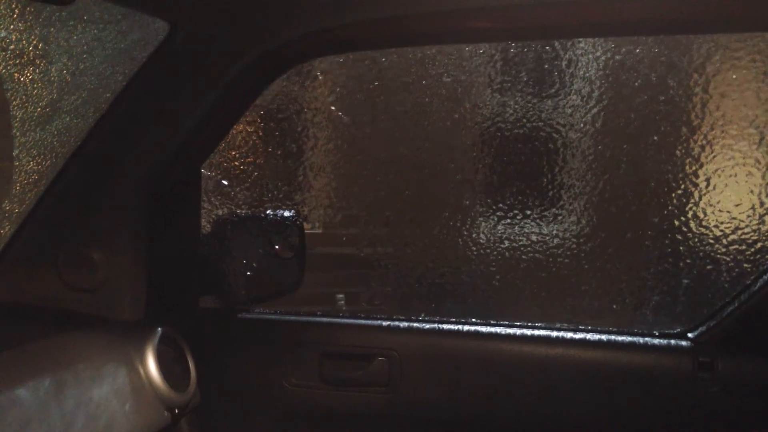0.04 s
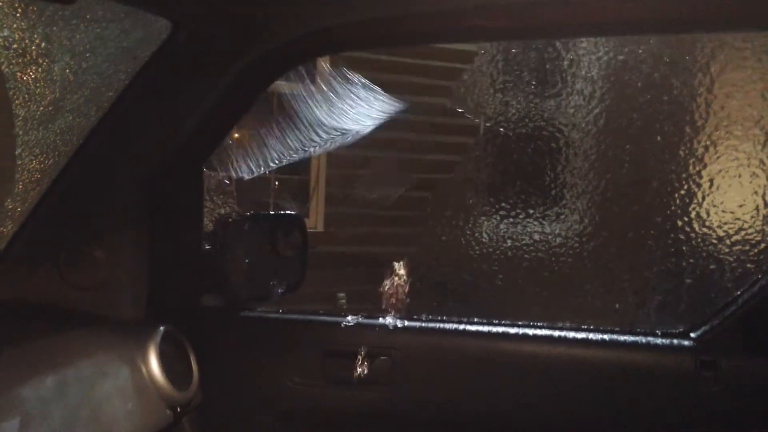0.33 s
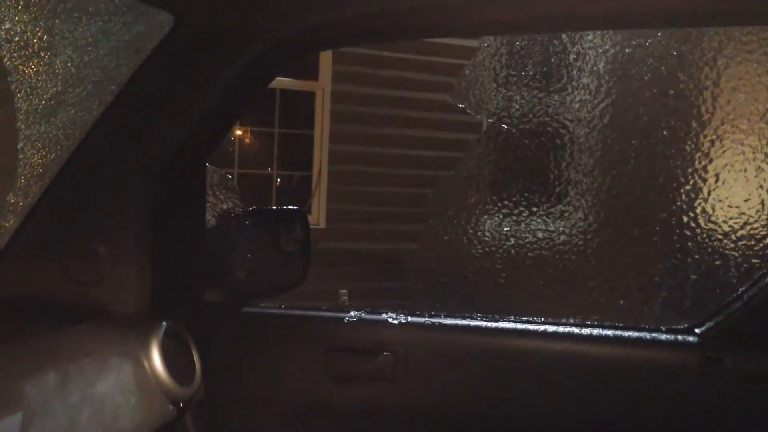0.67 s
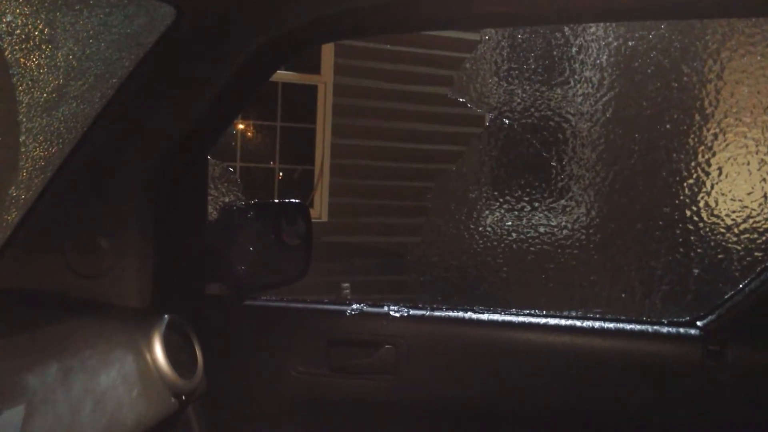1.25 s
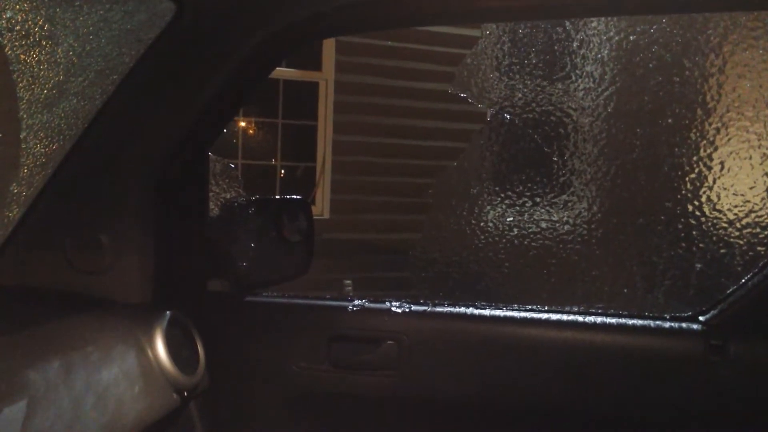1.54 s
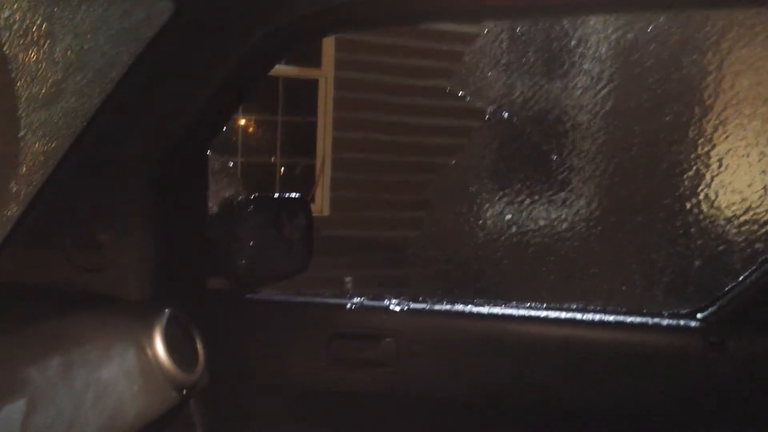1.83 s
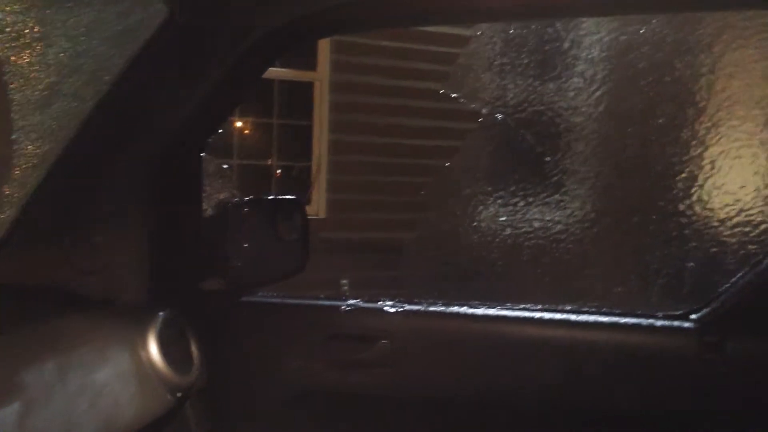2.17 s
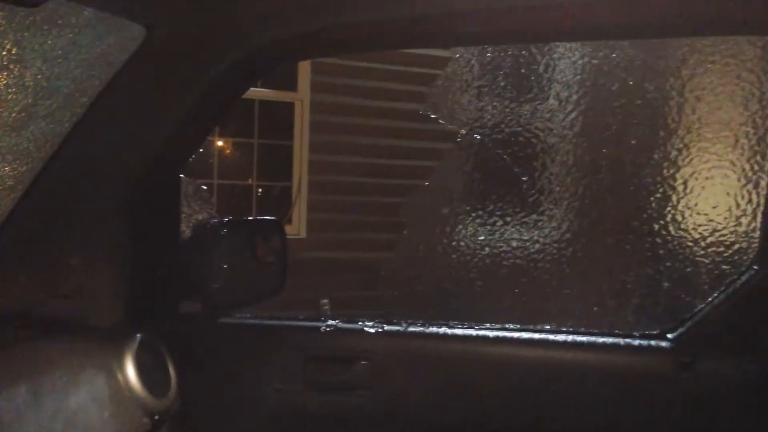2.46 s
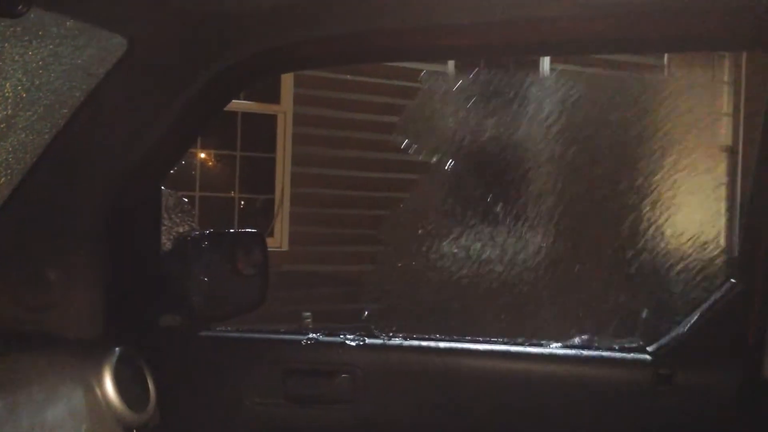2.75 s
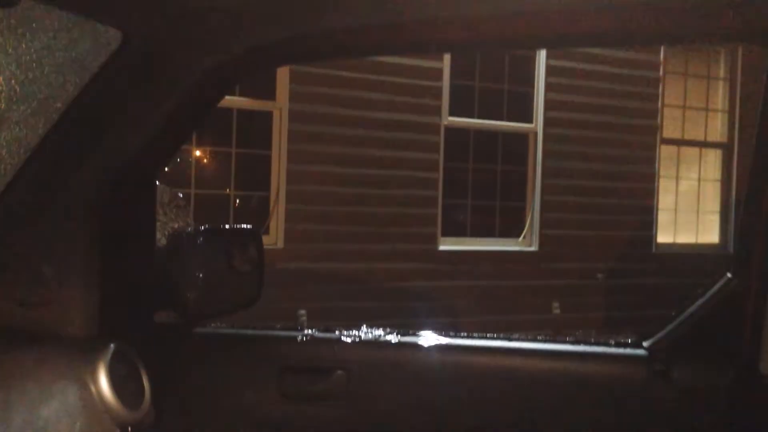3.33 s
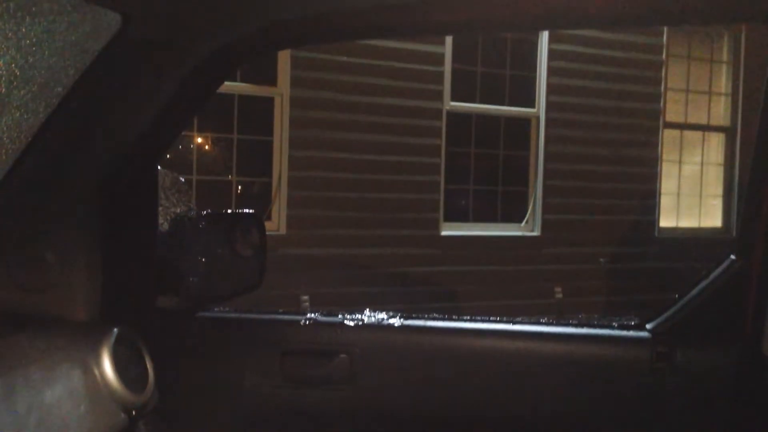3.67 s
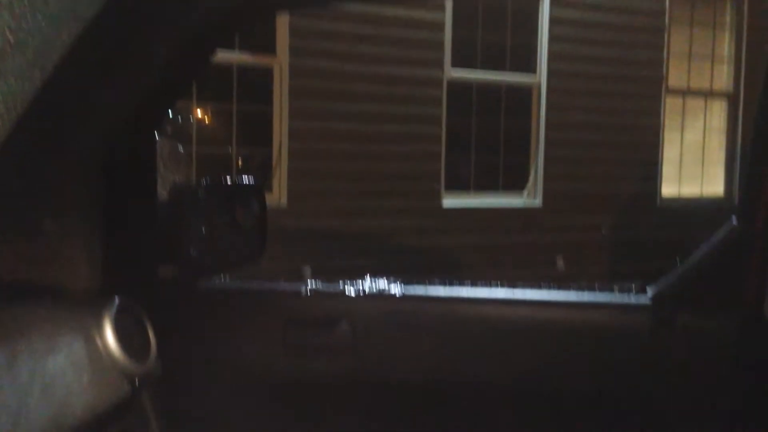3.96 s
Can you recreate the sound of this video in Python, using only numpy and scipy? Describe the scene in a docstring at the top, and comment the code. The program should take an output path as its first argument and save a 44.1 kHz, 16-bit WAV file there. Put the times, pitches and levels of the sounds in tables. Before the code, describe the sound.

Ice cracks off a car window, then shatters against the door over a low idling engine.

```python
"""In the seat of an idling car at night, a sheet of ice is heard breaking off the side window.
A first piece cracks by brittle fracture and crumbles away; after a pause the rest gives way, tips inward
and shatters on the door. Slabs thump the door panel, shards clink in their plate modes and crumbs
trickle down in tiny impacts, over the low harmonic hum of the engine."""
import sys
import numpy as np
from scipy import signal
from scipy.fft import rfft, irfft
from scipy.io import wavfile
from scipy.ndimage import uniform_filter1d

SR = 44100
rng = np.random.default_rng(int(sys.argv[2]) if len(sys.argv) > 2 else 0)


def store_pcm(level_fs):
    """Save levels as 16-bit WAV."""
    pcm = np.round(np.clip(level_fs, -1, 1) * 32767).astype(np.int16)
    wavfile.write(sys.argv[1], SR, np.atleast_2d(pcm).T)


N = 176400

# spectra of breaking ice in three registers: (frequency [Hz], relative spectral density [dB])
ICE_TREBLE = [(1800, -41), (3000, -9), (3900, 2), (6000, 3), (8500, 2.5), (11000, -1), (15000, -6)]
ICE_MIDDLE = [(450, -39.5), (800, -3.5), (1100, 0), (1700, 3), (2500, 4), (3300, -0.5), (4500, -10),
              (8000, -51)]
ICE_BODY = [(70, -29), (160, -4.5), (300, -7.5), (500, -10), (800, -6), (1100, -9.5), (2200, -46.5)]
# relative strength of the shower of fragments: (time [s], treble [dB], middle [dB], body [dB])
SHOWER_ENVELOPE = [(3.1, -37.5, -50.5, -80), (3.159, -34, -27.5, -40), (3.192, -52, -60, -59),
                   (3.225, -35, -41.5, -40.5), (3.295, -39.5, -53.5, -79), (3.315, -28, -33.5, -34),
                   (3.345, -26.5, -32.5, -48), (3.396, -26.5, -40, -23.5), (3.425, -30, -37.5, -45),
                   (3.47, -26, -34.5, -32), (3.59, -28, -34.5, -51), (3.64, -25.5, -31.5, -35.5),
                   (3.71, -25.5, -31, -43), (3.76, -31.5, -42.5, -52), (3.83, -37.5, -45.5, -60),
                   (3.88, -48.5, -48, -52.5), (4, -46, -52.5, -76)]


def amp(db):
    """Amplitude ratio of a level in decibels."""
    return 10 ** (np.asarray(db) / 20)


def unit(x):
    """Normalisation to rms 1."""
    return x / np.sqrt(np.mean(x ** 2) + 1e-20)


def add(mix, start_s, sound):
    """Superposition: a sound joins the mix at its starting time."""
    part = mix[max(round(start_s * SR), 0):][:len(sound)]
    part += sound[:len(part)]


def drift(size, rate_hz):
    """Low-pass noise: a smooth random wander of rms 1."""
    lowpass = np.exp(-(np.fft.rfftfreq(size, 1 / SR) / rate_hz) ** 2)
    return unit(irfft(rfft(rng.standard_normal(size)) * lowpass, size))


def gain_at(freqs, spectrum):
    """Amplitude response, interpolated in decibels over log frequency."""
    hz, db = np.transpose(spectrum)
    return amp(np.interp(np.log(abs(freqs) + 1), np.log(hz), db))


def colour(spectrum, size=2048):
    """Causal impulse response: the phase follows from the Hilbert transform of the log gain."""
    log_gain = np.log(gain_at(np.fft.fftfreq(size, 1 / SR), spectrum))
    return np.fft.ifft(np.exp(np.conj(signal.hilbert(log_gain)))).real[:size // 2]


def cabin_path(size=8192):
    """Reverberation: direct sound, quick reflections off glass and door, and a short decaying tail."""
    t = np.arange(size) / SR
    path = np.zeros(size)
    for t60, db in (0.06, 6.5), (0.16, 4.5):  # early reflections, tail
        echoes = rng.standard_normal(size) * (rng.random(size) < .1) * amp(-60 * t / t60)
        path += amp(db) * echoes / np.linalg.norm(echoes)
    path[0] = 1
    return path


def clicks(size, per_s, spread_db):
    """Poisson process: tiny fractures at random moments, most small and a few large."""
    strengths = amp(spread_db * np.minimum(rng.exponential(1, size), 4))
    return strengths * rng.choice([-1, 1], size) * (rng.random(size) < per_s / SR)


def idling_engine(firing_hz=38.66, jitter_hz=0.51, waver_hz=9, waver_db=1.6, air_db=-52):
    """Periodic firing gives a harmonic series, which wavers over the broadband noise of the cabin."""
    # cabin rumble and fan hiss: (frequency [Hz], relative spectral density [dB])
    air_spectrum = [(20, -15), (43, -4), (75, -5.5), (110, -1), (170, -12.5), (250, -11), (340, -22.5),
                    (480, -15.5), (850, -28), (1100, -22.5), (1350, -22), (1600, -24), (2500, -29.5),
                    (6000, -37.5), (15000, -46)]
    # harmonics of the firing rate, from the first up: (rms level [dB])
    harmonic_levels = [-54.5, -69, -52.5, -61.5, -61]
    air_gain = gain_at(np.fft.rfftfreq(N, 1 / SR), air_spectrum)
    out = amp(air_db) * unit(irfft(rfft(rng.standard_normal(N)) * air_gain, N))
    cycles = np.cumsum(firing_hz + jitter_hz * drift(N, waver_hz)) / SR
    for k, db in enumerate(harmonic_levels, 1):
        waver = amp(waver_db * drift(N, waver_hz))
        out += amp(db) * unit(waver * np.sin(2 * np.pi * (k * cycles + rng.random())))
    return out


def crumbs(envelope, per_s, spread_db, gain_db, ring_db, ring_t60, spots=6, mode_count=6):
    """Impact excitation: fragments tick at several spots, each ringing in a few random plate modes."""
    times, *levels = np.transpose(envelope)
    now = np.arange(times[0], times[-1], 1 / SR)
    rattle, out = np.zeros(len(now)), np.zeros(N)
    for _ in range(spots):
        path = cabin_path()
        path[0] *= 2  # small crumbs tick dry
        t = np.arange(len(path)) / SR
        mode_hz = rng.uniform(700, 6000, (mode_count, 1))
        modes = np.sin(2 * np.pi * mode_hz * t).sum(0) * amp(-60 * t / ring_t60)
        path += amp(ring_db) * modes / np.linalg.norm(modes)
        rattle += signal.fftconvolve(clicks(len(now), per_s / spots, spread_db), path)[:len(now)]
    for db, spectrum in zip(levels, (ICE_TREBLE, ICE_MIDDLE, ICE_BODY)):
        band = unit(signal.fftconvolve(rattle, colour(spectrum))[:len(now)])
        add(out, times[0], amp(np.interp(now, times, db) + gain_db) * band)
    return out


def peeling():
    """Friction: crumbs grind off the glass between the snaps."""
    # relative strength of the grinding: (time [s], treble [dB], middle [dB])
    envelope = [(0, -48.5, -50), (.11, -56, -59), (.14, -51.5, -59), (.27, -40.5, -50), (.47, -55, -65),
                (.545, -52, -58), (.6, -38.5, -44), (.68, -51, -69), (.76, -38.5, -43.5), (.86, -51, -66),
                (.91, -42, -46.5), (1.0, -50, -58), (1.06, -42.5, -54), (1.2, -63, -65), (1.32, -55.5, -73),
                (1.55, -69, -70), (2.35, -65.5, -70), (2.56, -54, -61.5), (2.66, -62, -67),
                (2.78, -50.5, -52), (2.85, -40.5, -48.5), (2.96, -55.5, -58), (3.02, -50, -46),
                (3.12, -47, -50.5)]
    return crumbs(envelope, per_s=700, spread_db=3.0, gain_db=-2, ring_db=-1.5, ring_t60=.02)


def cracks(build_s=0.0015, build_db=1, snap_db=-6, direct_db=-7, gain_db=-7.5):
    """Brittle fracture: splintering gathers just before each snap and dies away exponentially."""
    # snaps, with relative peak levels: (time [s], treble [dB], middle [dB], decay time constant [s])
    fractures = [(0.0597, -31.5, -33, 0.025), (0.1018, -33.5, -31.5, 0.0025), (0.166, -28, -33.5, 0.0068),
                 (0.243, -31.5, -36.5, 0.0052), (0.271, -37, -39.5, 0.005), (0.296, -34, -36.5, 0.0033),
                 (0.3682, -38, -36.5, 0.0017), (0.419, -36, -45, 0.0021), (0.436, -40, -42.5, 0.0034),
                 (0.553, -35, -39, 0.0048), (0.5601, -21.5, -26.5, 0.0048), (0.571, -27.5, -26.5, 0.0013),
                 (0.585, -27, -42, 0.0076), (0.611, -26.5, -34, 0.0085), (0.629, -23, -46, 0.0024),
                 (0.7049, -32.5, -30, 0.0024), (0.724, -32, -35, 0.0037), (0.774, -29, -52, 0.0042),
                 (0.7957, -28.5, -36, 0.003), (0.8179, -50, -35.5, 0.0039), (0.8795, -29, -39, 0.004),
                 (0.8876, -21.5, -37, 0.0062), (0.8954, -25.5, -43, 0.0022), (0.963, -32.5, -37.5, 0.0039),
                 (1.0215, -32.5, -32.5, 0.006), (1.0443, -32.5, -55, 0.0025), (1.083, -33.5, -40, 0.0032),
                 (1.1229, -40.5, -38.5, 0.0081), (1.2788, -40.5, -40.5, 0.003), (1.2902, -33.5, -48, 0.003),
                 (1.299, -36.5, -47.5, 0.005), (1.34, -41.5, -44, 0.0012), (1.378, -40.5, -71, 0.0018),
                 (2.536, -44, -67, 0.0036), (2.675, -49.5, -48.5, 0.002), (2.7113, -41, -44.5, 0.0085),
                 (2.7746, -42, -49, 0.0034), (2.8044, -37.5, -36, 0.0035), (2.9031, -36, -48, 0.002),
                 (3.1195, -23.5, -29, 0.0051), (3.142, -17.5, -25.5, 0.014), (3.1554, -10.5, -22, 0.0051),
                 (3.1611, -16, -38, 0.0023), (3.1965, -35, -26.5, 0.0022), (3.2099, -24.5, -34, 0.0057),
                 (3.2258, -17, -37, 0.0045), (3.2998, -26, -28, 0.0052), (3.3251, -18, -26, 0.0029),
                 (3.3343, -14, -14, 0.0059), (3.357, -16, -19.5, 0.0024), (3.3876, -22.5, -18, 0.0041),
                 (3.3929, -22.5, -19.5, 0.0049), (3.4313, -27, -28, 0.0032), (3.4579, -22, -23.5, 0.002),
                 (3.4672, -20.5, -36, 0.0022), (3.5295, -21.5, -27, 0.0028), (3.544, -24, -24, 0.0051),
                 (3.6237, -18.5, -24.5, 0.0037), (3.633, -34, -18, 0.0027), (3.6523, -27, -23, 0.0055),
                 (3.6842, -20, -23, 0.0059), (3.785, -26, -39, 0.0042), (3.852, -31.5, -34.5, 0.033),
                 (3.895, -26.5, -33, 0.0047), (3.914, -25.5, -50, 0.0027), (3.9316, -29, -56, 0.005)]
    typical_treble_db, typical_middle_db = -26, -38.5  # an ordinary crack
    size, snap_at = 8192, 600  # samples
    out, t = np.zeros(N), (np.arange(size) - snap_at) / SR
    middle, body = colour(ICE_MIDDLE), colour(ICE_BODY)
    for start_s, treble_db, middle_db, decay_s in fractures:
        stress = np.where(t < 0, amp(build_db) * np.exp(-abs(t) / build_s), np.exp(-abs(t) / decay_s))
        splinters = clicks(size, per_s=2400, spread_db=4.5) * stress
        splinters /= np.linalg.norm(splinters) + 1e-9
        splinters[snap_at] += amp(snap_db)
        heard = signal.fftconvolve(splinters, cabin_path())[:size]
        heard[snap_at] += amp(direct_db)  # the snap also comes straight through the glass
        bulk_db = middle_db - typical_middle_db
        body_db = middle_db - 12 + 0.15 * bulk_db  # bigger pieces gain body
        tilt_db_per_octave = 0.42 * (treble_db - typical_treble_db - bulk_db)  # thin ones are brighter
        treble = colour([(hz, db + tilt_db_per_octave * np.log2(hz / SR)) for hz, db in ICE_TREBLE])
        for db, register in (treble_db, treble), (middle_db, middle), (body_db, body):
            band = signal.fftconvolve(heard, register)
            peak_rms = np.sqrt(uniform_filter1d(band ** 2, 350, mode="constant").max())
            add(out, start_s + t[0], amp(db + gain_db) * band / peak_rms)
    return out


def struck_mode(hz, db, t60, rise_s, size=16384):
    """Damped oscillator: a sinusoid rises quickly and decays exponentially."""
    t = np.arange(size) / SR
    return amp(db - 60 * t / t60) * np.minimum(t / rise_s, 1) * np.sin(2 * np.pi * hz * t)


def roughen(tone, depth, rate_hz):
    """Random amplitude modulation that preserves the rms level."""
    return np.std(tone) * unit(tone * (1 + depth * drift(len(tone), rate_hz)))


def shard(hz, db):
    """Free vibration: a small plate rings in inharmonic modes, chattering against what it lands on."""
    # plate modes: (frequency / pitch [ratio], relative level [dB], t60 [s])
    modes = [(0.997, 1, 0.045), (1.498, -15, 0.039), (3.4, -20, 0.049)]
    tone = sum(struck_mode(hz * k, db + mode_db, t60, rise_s=0.0017) for k, mode_db, t60 in modes)
    return roughen(tone, depth=0.56, rate_hz=140)


def clinks(per_s=96, low_hz=529, high_hz=4890, gain_db=1.5):
    """Plate resonance: a few large shards ring, and many of random pitch follow the shower's strength."""
    # large loose shards: (time [s], pitch [Hz], level [dB])
    large_shards = [(0.1, 1490, -43), (0.557, 1700, -26), (1.122, 1177, -29.5), (3.301, 842, -27),
                    (3.499, 1720, -22.5), (3.766, 1716, -24.5), (3.901, 3170, -26.5)]
    out = np.zeros(N)
    for start_s, hz, db in large_shards:
        add(out, start_s, shard(hz, db))
    times, _, middle_db, _ = np.transpose(SHOWER_ENVELOPE)
    span_s = times[-1] - times[0]
    for when, pitch in rng.random((round(per_s * span_s), 2)):
        start_s = times[0] + when * span_s
        hz = low_hz * (high_hz / low_hz) ** pitch
        add(out, start_s, shard(hz, np.interp(start_s, times, middle_db) + gain_db))
    return out


def thumps():
    """Damped panel resonance: the window and padded door boom and shudder under the larger slabs."""
    # slabs knocking on the glass and landing on the door: (time [s], pitch [Hz], level [dB], t60 [s])
    slabs = [(0.111, 162, -30.5, 0.1), (0.563, 587, -30, 0.049), (2.816, 134, -34, 0.25),
             (3.334, 151, -30, 0.11), (3.389, 650, -18, 0.03), (3.391, 118.4, -15, 0.19),
             (3.473, 242, -28, 0.099), (3.477, 133, -24, 0.12), (3.55, 385, -28, 0.055),
             (3.633, 373, -12.5, 0.029), (3.657, 122, -25, 0.094)]
    out = np.zeros(N)
    for start_s, hz, db, t60 in slabs:
        boom = struck_mode(hz, db, t60, rise_s=0.007)
        add(out, start_s, roughen(boom, depth=0.57, rate_hz=60))
    return out


def shower():
    """Shot noise: the sheet collapses into fragments whose dense impacts merge into a rush."""
    return crumbs(SHOWER_ENVELOPE, per_s=1600, spread_db=2.5, gain_db=-1.34, ring_db=-8, ring_t60=0.086)


def scene():
    """Superposition of the engine and the breaking ice at the seat, in one channel."""
    return (idling_engine() + cracks() + clinks() + thumps() + peeling() + shower())[None]


def record(dry):
    """Band limiting: a linear-phase low-pass filter removes the highest treble."""
    cutoff_hz = 15350
    lowpass = signal.firwin(401, cutoff_hz, window=("kaiser", 9), fs=SR)
    return signal.oaconvolve(dry, lowpass[None], "same")


dry = scene()
out = record(dry)
store_pcm(out)
```